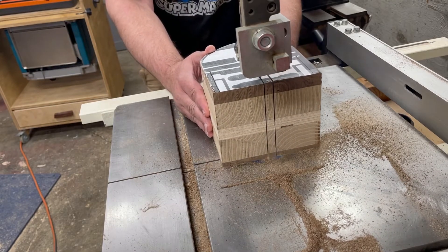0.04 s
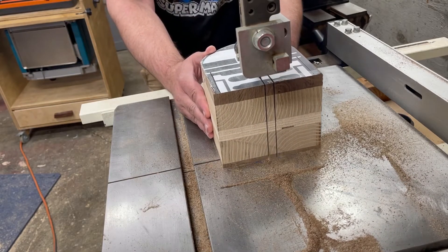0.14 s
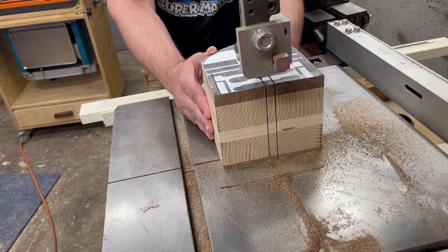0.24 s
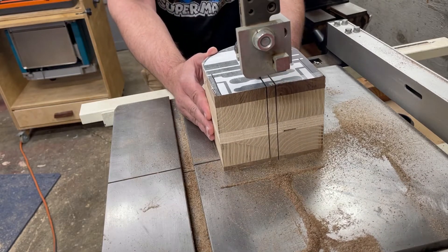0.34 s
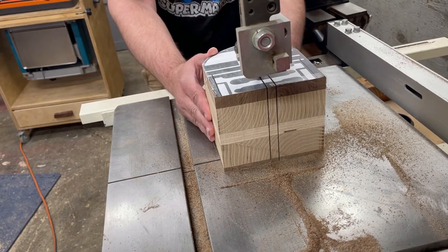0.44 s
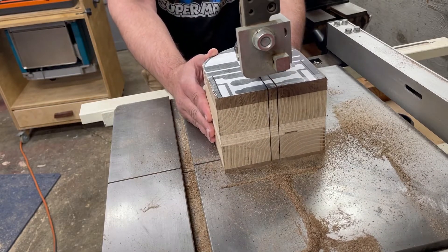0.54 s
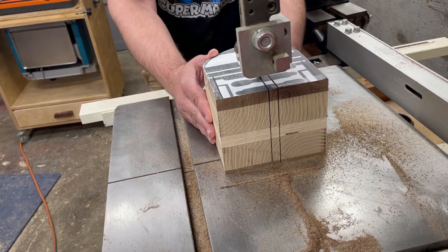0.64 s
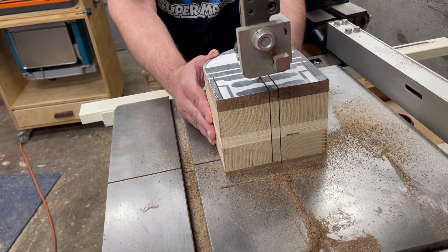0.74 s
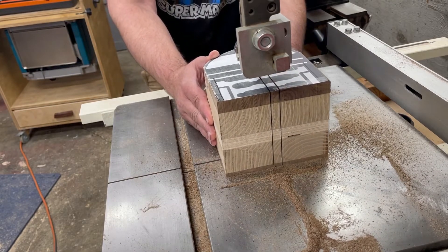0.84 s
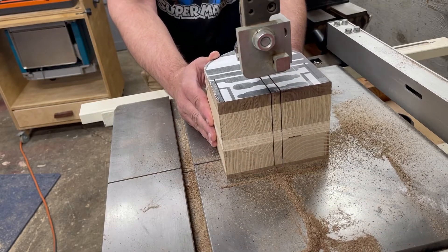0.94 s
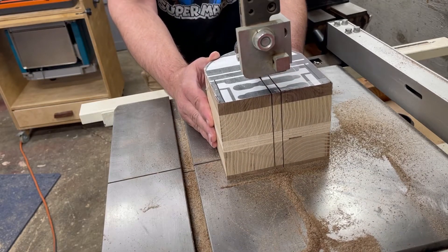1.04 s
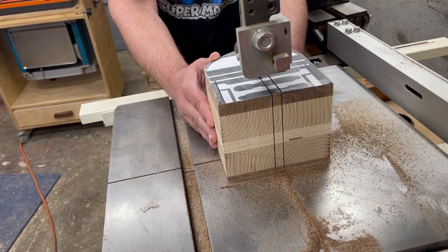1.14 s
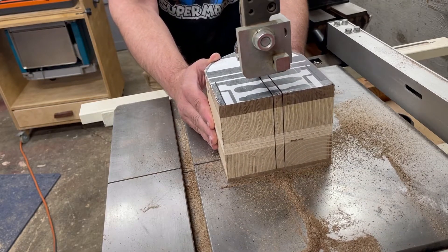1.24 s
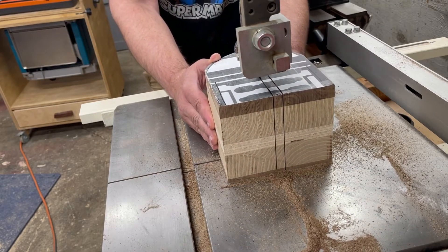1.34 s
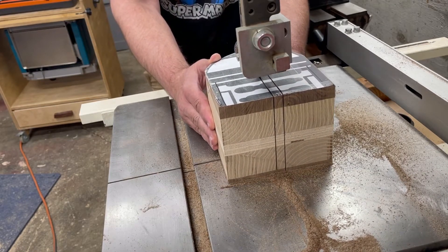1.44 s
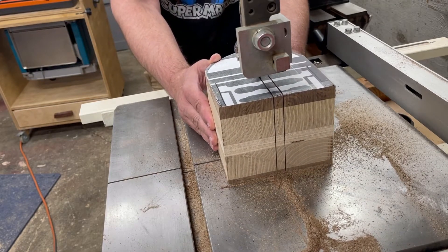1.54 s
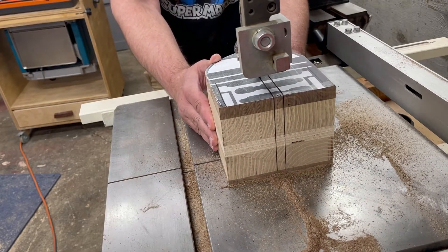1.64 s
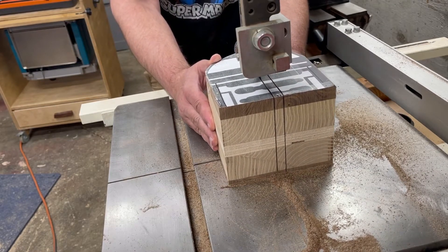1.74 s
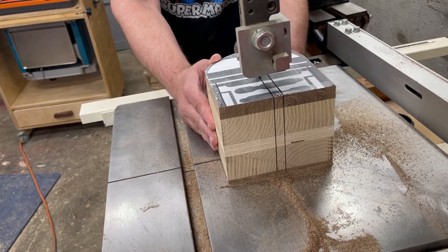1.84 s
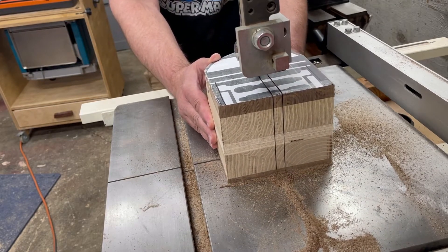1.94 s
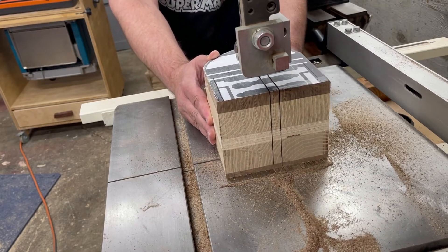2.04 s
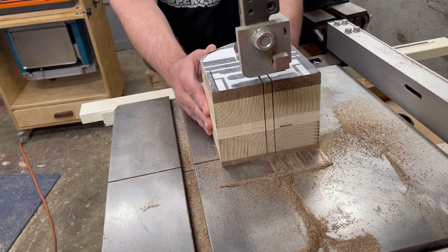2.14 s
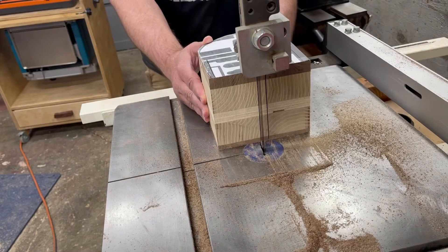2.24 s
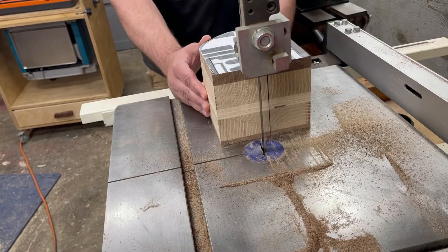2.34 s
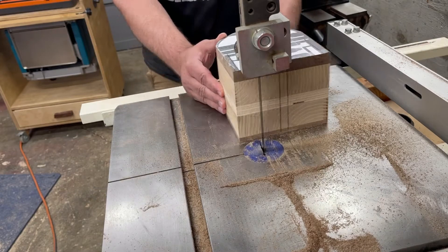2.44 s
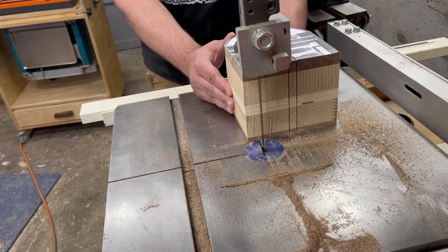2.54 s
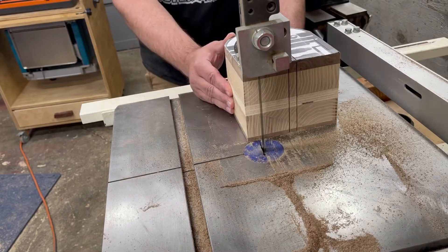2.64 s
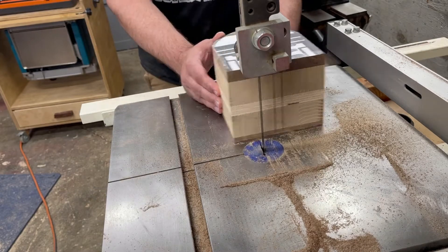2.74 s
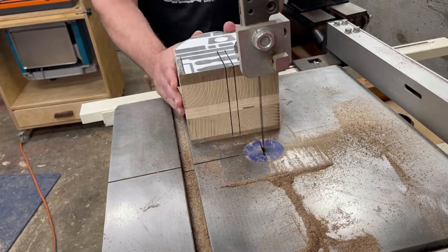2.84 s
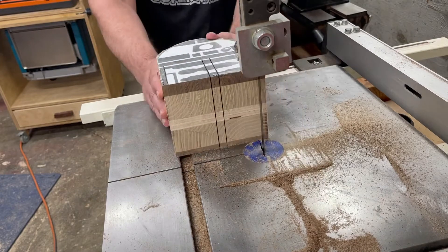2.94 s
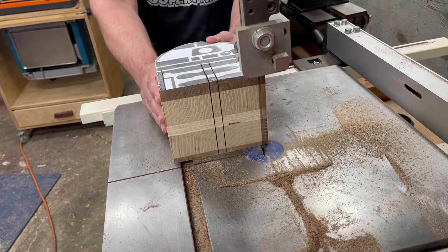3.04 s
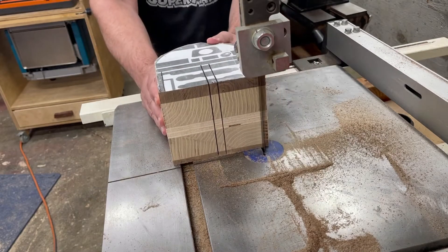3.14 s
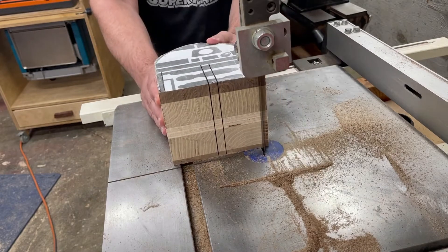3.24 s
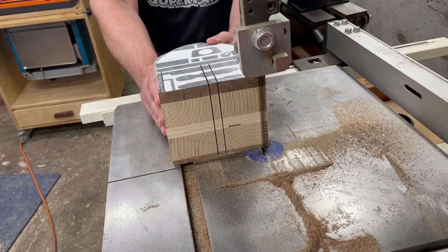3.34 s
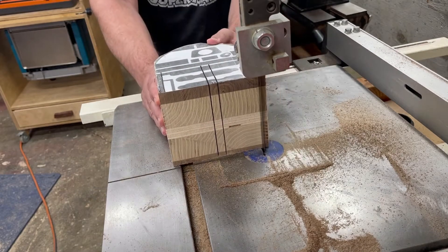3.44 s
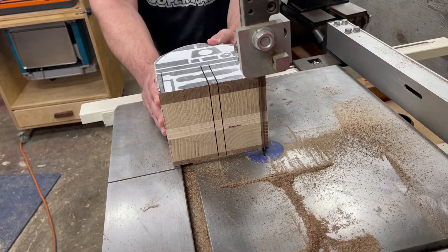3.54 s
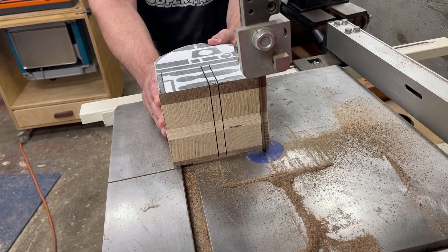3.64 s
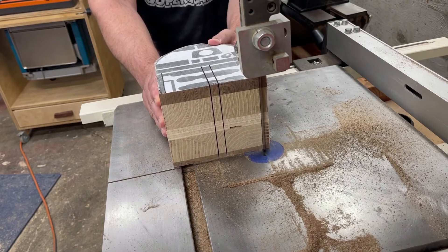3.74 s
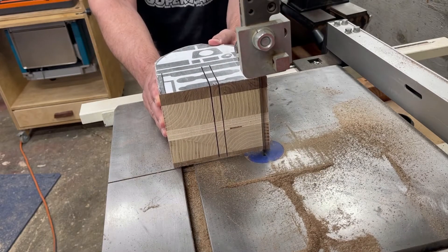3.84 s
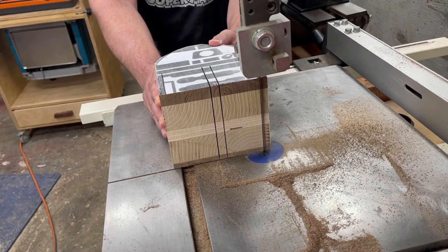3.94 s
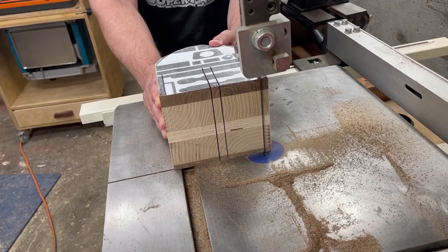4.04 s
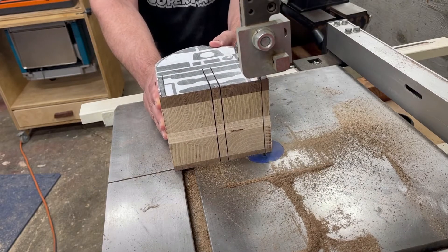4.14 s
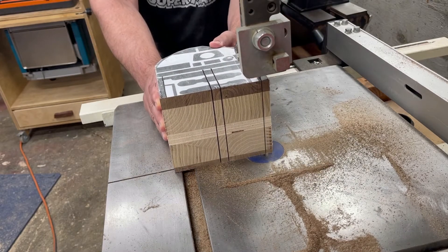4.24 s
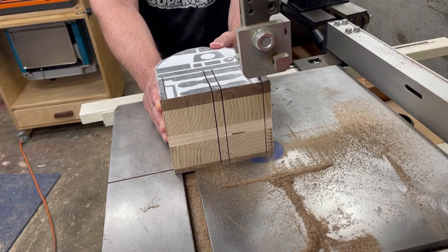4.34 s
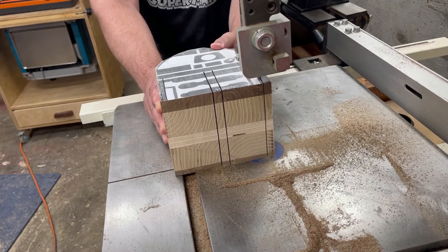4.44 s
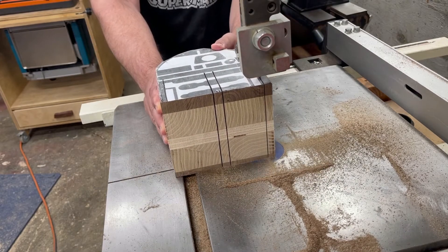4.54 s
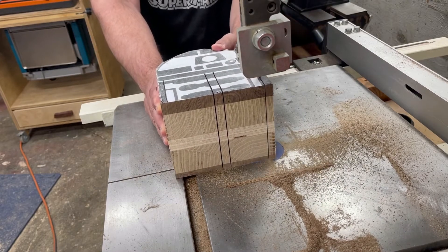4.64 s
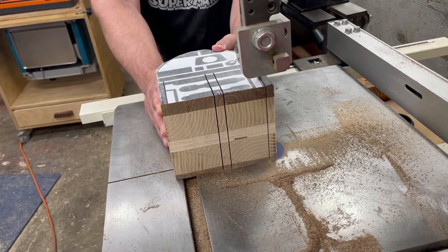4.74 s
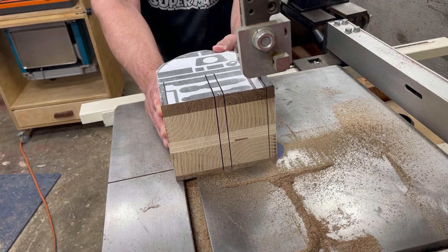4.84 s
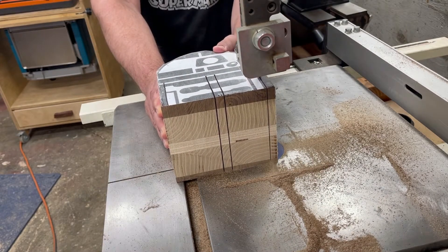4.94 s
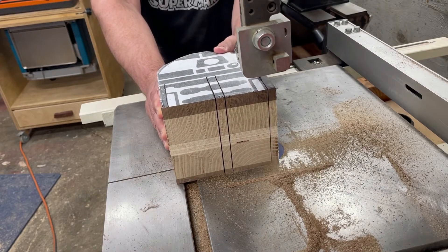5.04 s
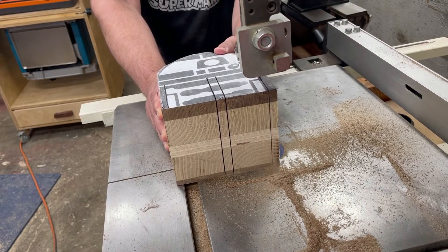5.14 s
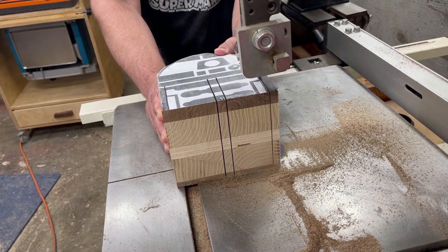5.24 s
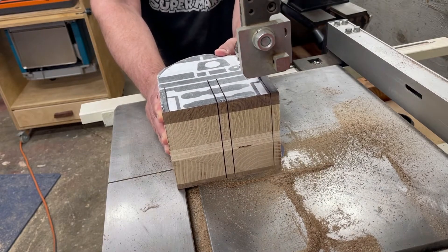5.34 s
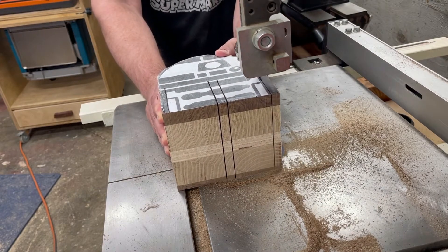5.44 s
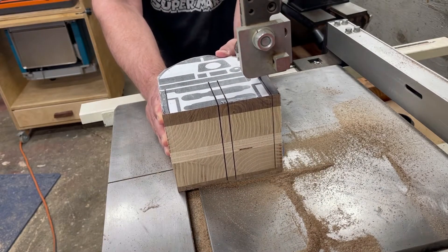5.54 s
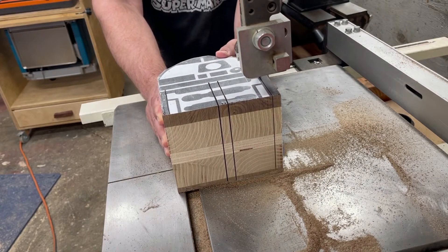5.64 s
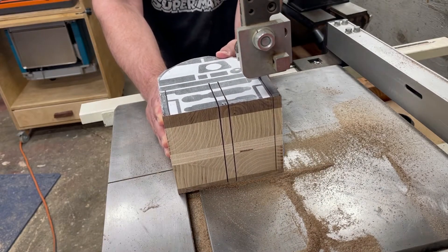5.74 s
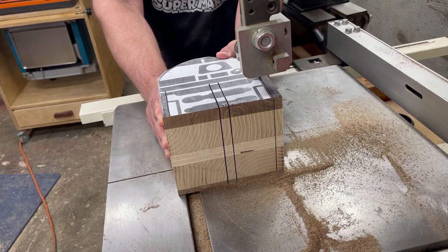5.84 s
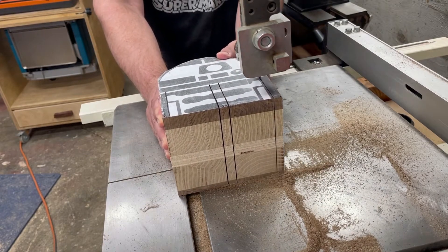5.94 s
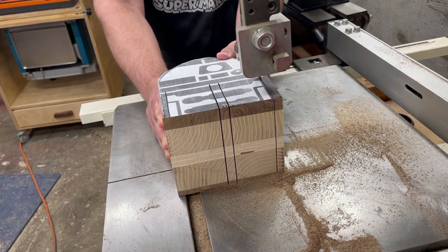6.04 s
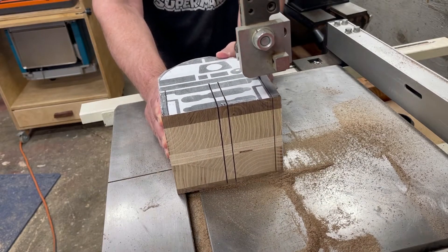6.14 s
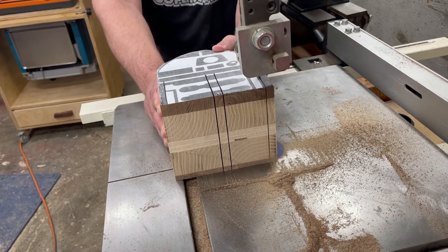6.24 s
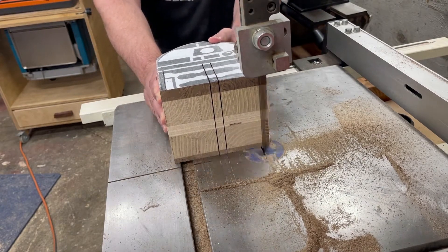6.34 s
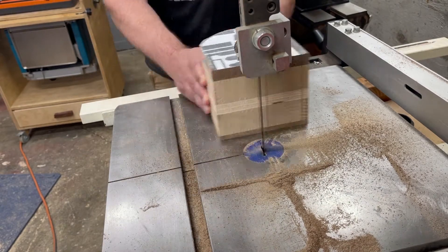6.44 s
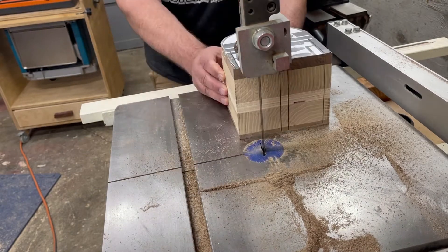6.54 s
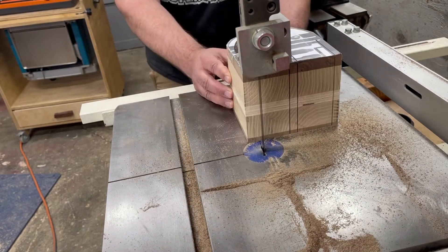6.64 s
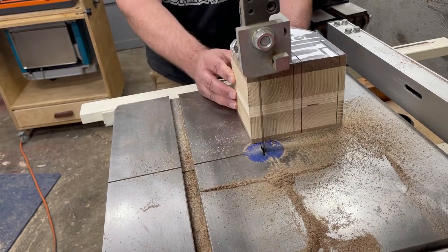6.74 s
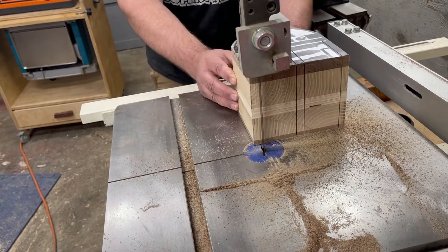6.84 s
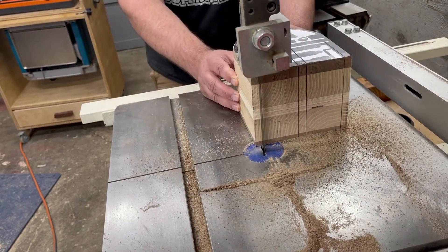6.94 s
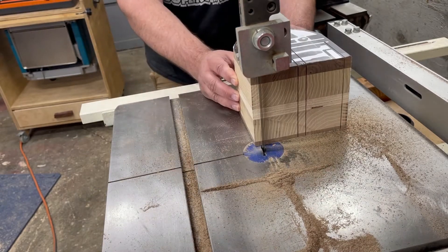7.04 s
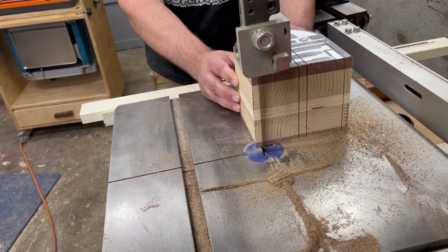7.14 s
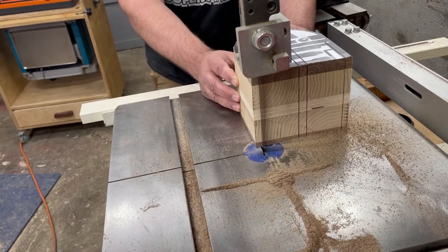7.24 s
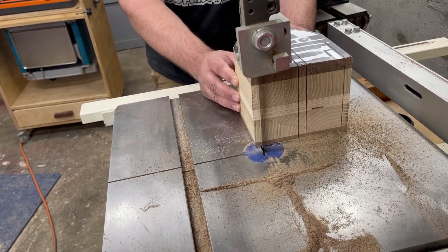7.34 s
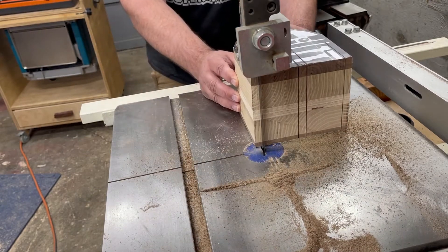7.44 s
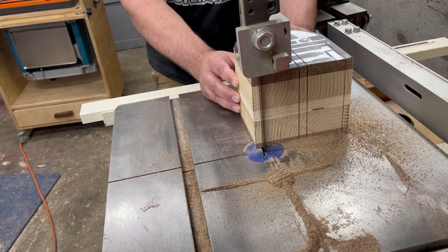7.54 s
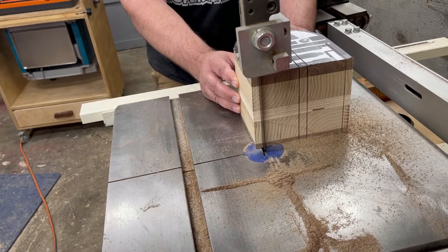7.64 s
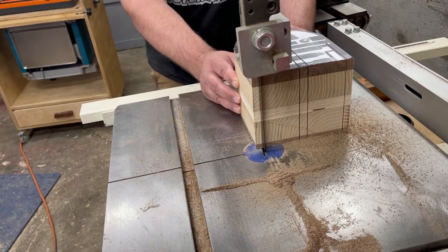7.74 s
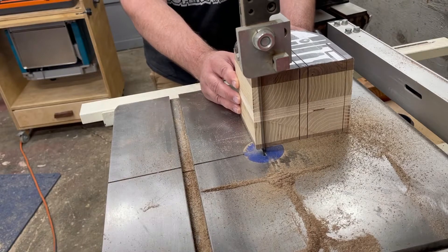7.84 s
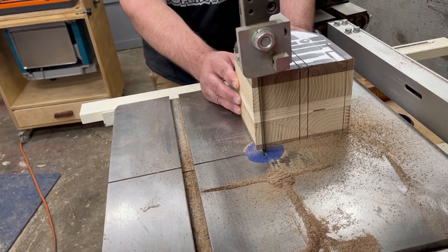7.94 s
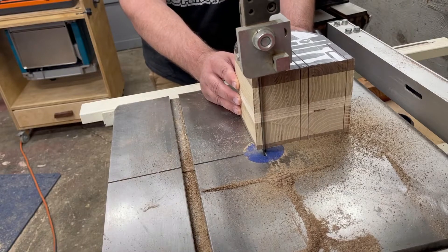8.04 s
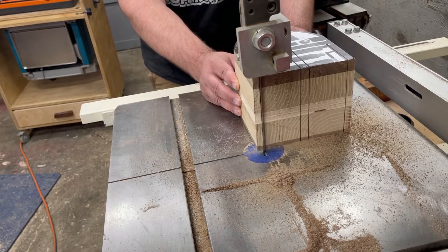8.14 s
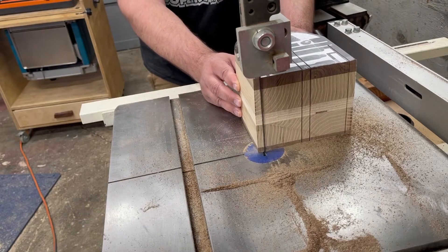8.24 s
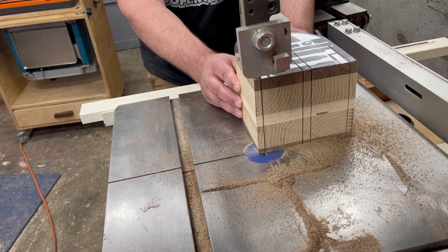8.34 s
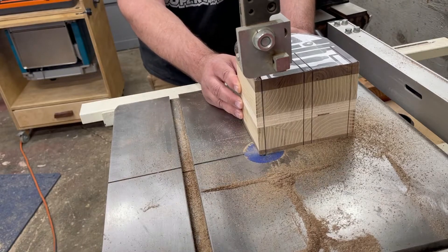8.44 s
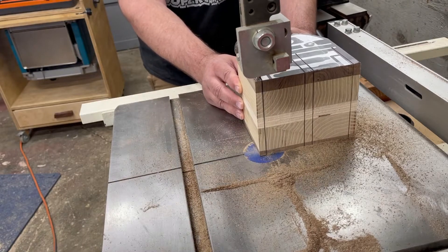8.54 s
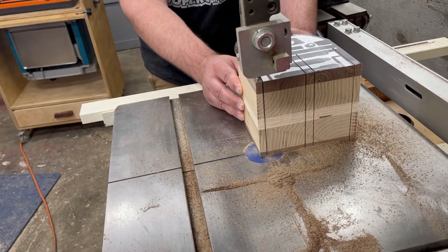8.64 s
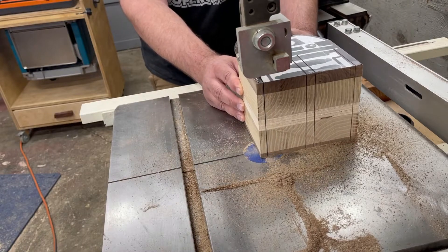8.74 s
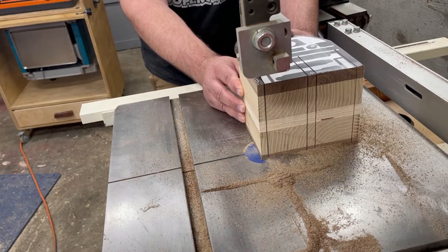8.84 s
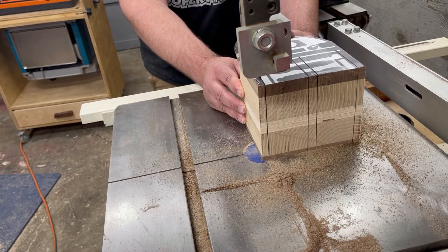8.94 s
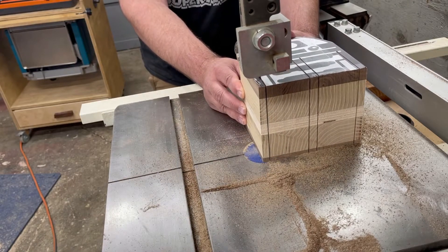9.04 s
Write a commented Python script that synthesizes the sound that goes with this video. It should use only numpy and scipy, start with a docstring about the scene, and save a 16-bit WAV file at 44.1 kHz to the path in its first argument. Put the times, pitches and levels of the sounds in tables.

```python
"""A bandsaw in a workshop takes three slices off a thick wooden block; the first is under way at the start.
Motor, wheels and guides hum throughout, and noise swishes along with the running band.
In each slice the teeth chip the wood and ring the steel band near 8 kHz; friction makes band and block sing
for moments, and the block chatters. The band's flank rubs its way out of the first slice, in and out of the
second after a gap, and into the third, which is still being cut at the end."""
import sys
import numpy as np
from scipy import signal
from scipy.fft import rfft, irfft, next_fast_len
from scipy.io import wavfile

SR = 44100
rng = np.random.default_rng(int(sys.argv[2]) if len(sys.argv) > 2 else 0)


def transcribe(u):
    """Save the signal u as a 16-bit wav file named by the first command-line argument.

    u: samples, shape (n,) or (channels, n), limited to [-1, 1]; the rate is SR.
    q: integer samples, one column per channel.
    """
    v = np.clip(np.atleast_2d(u).T, -1, 1)
    q = np.round(v * 32767).astype(np.int16)
    wavfile.write(sys.argv[1], SR, q)


N = 400869
TIME = np.arange(N) / SR  # s
PATTERN_HZ = 398  # repeat rate of the tooth pattern

# how hard the block is fed, one list of points for each slice: (t/s, feed/dB)
FEED = [
    [(0.0, -41), (0.01, -43), (0.77, -47.5), (0.83, -44.5), (1.07, -47), (1.21, -43), (1.41, -49.5),
     (1.43, -49.5), (1.69, -49), (1.86, -59), (2.17, -70), (2.19, -69)],
    [(3.17, -76), (3.41, -72), (3.49, -50), (3.68, -41.5), (3.8, -38.5), (4.44, -43), (4.52, -45),
     (4.88, -44.5), (5.03, -41), (5.88, -48.5), (6.16, -64.5), (6.33, -60.5)],
    [(7.6, -67), (7.644, -69), (7.736, -57.5), (7.932, -48.5), (7.972, -42.5), (8.168, -35.5),
     (8.172, -37.5), (8.358, -42.5), (8.38, -41), (8.578, -46), (8.586, -43.5), (9.09, -43)],
]


def from_db(db):
    """Decibels to gain."""
    return 10 ** (np.asarray(db) / 20)


def rms_one(x):
    """Scale to unit rms."""
    return x / np.sqrt(np.mean(x ** 2) + 1e-20)


def at_hz(points, hz):
    """Read a table on a log-frequency axis."""
    f, value = np.transpose(points)
    return np.interp(np.log(hz), np.log(f), value)


def in_time(rows):
    """Join the rows of a curve by straight lines."""
    s, *columns = np.transpose(rows)
    return [np.interp(TIME, s, c) for c in columns]


def spell(start, end, ramp):
    """On from start to end, with a short ramp outside either edge."""
    return np.clip(1 + np.minimum(TIME - start, end - TIME) / ramp, 0, 1)


def swell(start, end):
    """Rise after the start, hold, and die by the end."""
    ramp = .077  # s
    return spell(start + ramp, end - ramp, ramp)


def drift(rate):
    """Smooth chance of spread 1, changing at about the given rate in Hz."""
    step = 16  # samples between the points of the slow curve
    r = np.exp(-2 * np.pi * step * rate / SR)
    chance = rng.standard_normal(N // step + 3002)
    slow = signal.lfilter([1], [1, -2 * r, r * r], chance)[3000:]  # drop the filter's start-up
    return np.interp(np.arange(N) / step, np.arange(len(slow)), rms_one(slow))


def shape(x, gain_at):
    """Filter by a gain given as a function of frequency."""
    size = next_fast_len(N + 4096, real=True)
    hz = np.maximum(np.arange(size // 2 + 1) * SR / size, 1)
    return irfft(rfft(x, size) * gain_at(hz), size)[..., :N]


def high_pass(x, hz):
    """Thin out everything below the given frequency."""
    return signal.sosfilt(signal.butter(2, hz, "high", fs=SR, output="sos"), x)


def colour(x, spectrum):
    """Give a signal a broad spectrum; rms 1."""
    return rms_one(shape(x, lambda hz: from_db(at_hz(spectrum, hz))))


def resonate(x, modes, tilt_db=0):
    """Parallel resonances of alternating sign, leaning by tilt_db from the first to the last; rms 1."""
    out, power = 0, 0
    for k, (hz, width, db) in enumerate(modes):
        r = np.exp(-np.pi * width / SR)
        gain = from_db(db + tilt_db * (k / len(modes) - .5))
        feedforward = np.array([1, 0, -1]) * (1 - r * r) / 2
        feedback = [1, -2 * r * np.cos(2 * np.pi * hz / SR), r * r]
        out = out + (-1) ** k * gain * signal.lfilter(feedforward, feedback, x)
        power = power + gain ** 2 * width
    return rms_one(out / np.sqrt(power))


def tone(hz, wander_hz, flutter_db):
    """A machine tone wavering in pitch and level; rows are the direct and the reflected sound."""
    phase = 2 * np.pi * np.cumsum(hz + wander_hz * drift(6.09)) / SR
    level = np.sqrt(2) * from_db(flutter_db * drift(3.05))
    return level * np.array([np.sin(phase), np.cos(phase) * rng.choice([-1, 1])])


def feeding():
    """Whether the teeth are in the wood (0-1), and the feed in dB above a steady one."""
    catch_s, steady_feed_db = .03, -44  # the teeth take catch_s to catch the wood or to clear it
    in_wood = sum(spell(rows[0][0], rows[-1][0], catch_s) for rows in FEED)
    return in_wood, in_time(np.concatenate(FEED))[0] - steady_feed_db


def time_in_slice():
    """Seconds since the teeth last entered the wood."""
    return TIME - np.max([rows[0][0] * (TIME >= rows[0][0]) for rows in FEED], axis=0)


def shaking():
    """The shake of the frame in dB above the usual: each surge builds slowly and settles quickly."""
    # the shake grows while the band runs free and peaks as the teeth bite again: (peak t/s, rise/dB)
    surges = [(3.7, 9.5), (7.98, 8.5)]
    settled_db, build_s, settle_s = -2.5, 1.0, 0.25
    shake_db = settled_db
    for peak, rise_db in surges:
        distance = np.maximum((peak - TIME) / build_s, (TIME - peak) / settle_s)
        shake_db = shake_db + rise_db * np.exp(-distance)
    return shake_db


def motor(shake_db):
    """Steady tones of motor and bearings over a low rumble, louder as the frame shakes."""
    # tones of motor and bearings at the usual shake: (f/Hz, level/dB)
    hum_tones = [(120, -114), (176, -104), (212, -100), (239, -95), (320, -89.5), (360, -99.5),
                 (646, -86.5), (802, -80.5), (843, -86.5), (883, -82), (959, -79.5), (1005, -83.5)]
    # colour of the rumble: (f/Hz, density/dB)
    rumble_colour = [(15, -2), (50, -2), (100, -11), (150, -2), (300, -21)]
    rumble_db, gain_per_shake = -115, 0.88  # level at the usual shake; dB per dB of shake
    hum = sum(from_db(db) * tone(hz, wander_hz=0.91, flutter_db=3.0) for hz, db in hum_tones)
    rumble = from_db(rumble_db) * colour(rng.standard_normal((2, N)), rumble_colour)
    return from_db(gain_per_shake * shake_db) * (hum + rumble)


def wheels(in_wood, feed_db, shake_db):
    """Tooth pattern, wheel hum and band drone beat about forty times a second; wood damps the drone."""
    wheel_hz, drone_hz = 440.4, 480.3
    # levels at a steady feed and the usual shake, before the wood damps the drone
    pattern_db, wheel_db, drone_db = -80, -77, -72
    pattern_per_feed, pattern_per_shake = 0.26, 1.2  # dB per dB
    wheel_per_shake, drone_per_shake = 1, 1  # dB per dB
    drone_damping = 7.7  # by the wood at a steady feed
    pattern = in_wood * from_db(pattern_db + pattern_per_feed * feed_db + pattern_per_shake * shake_db)
    wheel = from_db(wheel_db + wheel_per_shake * shake_db)
    free_drone = from_db(drone_db + drone_per_shake * shake_db)
    drone = free_drone / (1 + drone_damping * in_wood * from_db(feed_db))
    tones = [(PATTERN_HZ, pattern), (wheel_hz, wheel), (drone_hz, drone)]
    return sum(level * tone(hz, wander_hz=.6, flutter_db=.7) for hz, level in tones)


def whine(hz):
    """A line that roughens with its pitch, as the band shivers in the guides."""
    shiver = 0.83 + .5 * drift(hz / 70)
    return tone(hz, wander_hz=hz * 0.001205, flutter_db=2.5) * shiver


def guides(in_wood, feed_db):
    """The band whines in its guides on many lines, and the wood damps them."""
    # lines of the band running free, before the shiver: (f/Hz, level/dB)
    lines = [(457, -78.5), (764, -83.5), (1287, -81.5), (1324, -90.5), (1540, -83.5), (2040, -79.5),
             (2089, -92), (2638, -82), (2756, -79), (2880, -79), (2998, -85.5), (3752, -84.5), (5179, -77),
             (5259, -81), (5792, -81.5), (9600, -88)]
    damping = 0.67  # by the wood at a steady feed
    free_whine = sum(from_db(db) * whine(hz) for hz, db in lines)
    return free_whine / (1 + damping * in_wood * from_db(feed_db))


def machine():
    """Motor, wheels and guides sound together, moved by the same feed and shake."""
    (in_wood, feed_db), shake_db = feeding(), shaking()
    return wheels(in_wood, feed_db, shake_db) + motor(shake_db) + guides(in_wood, feed_db)


def running_band():
    """The band swishes through its guides and the wheels stir the air, more as the frame shakes."""
    # colour of the swish: (f/Hz, density/dB)
    swish_colour = [(90, -56), (140, -39), (200, -21), (400, -16.5), (560, -13), (740, -10), (980, 0.5),
                    (1130, -10.5), (1750, -13), (2750, -14.5), (4300, -17), (5400, -11.5), (6300, -17.5),
                    (7700, -13), (9500, -19), (10100, -19), (12500, -20.5), (15500, -23.5)]
    swish_db, gain_per_shake = -68, 0.8  # level at the usual shake; dB per dB of shake
    level = from_db(swish_db + gain_per_shake * shaking() + .5 * drift(18))
    return level * colour(rng.standard_normal((2, N)), swish_colour)


def sing(hz, width, level):
    """One mode fed by friction, wavering in pitch and strength; rows are the direct and the reflected sound."""
    out, on = np.zeros((2, N)), level > 0
    sway = 1.01 + 0.36 * (drift(width) + 1j * drift(width))[on]
    phase = 2 * np.pi * np.cumsum(hz + 0.405 * width * drift(width)[on]) / SR
    wave = np.sqrt(2) * level[on] * sway * np.exp(1j * phase)
    out[:, on] = [wave.real, wave.imag * rng.choice([-1, 1])]
    return out


def chattering():
    """The block chatters on one broad mode when it is forced against the band or breaks free of it."""
    # spells of chatter: (start t/s, end t/s, level/dB)
    spells = [(1.2, 1.85, -69), (1.838, 2.215, -69), (6.081, 6.447, -65.5), (7.8, 8.25, -64.5)]
    return sum(sing(966, 120, from_db(db) * swell(start, end)) for start, end, db in spells)


def singing():
    """Friction holds single modes of band and block in song for a while; each swells, holds and dies."""
    # songs of band and block: (start t/s, end t/s, f/Hz, level/dB)
    songs = [(0, .4, 1248, -70), (0, 1.32, 3635, -69), (0, 1.35, 5510, -68), (1.13, 1.89, 580.5, -68),
             (1.28, 1.886, 6650, -62.5), (1.34, 1.793, 8300, -63), (1.6, 1.987, 2444, -72),
             (1.72, 1.92, 9370, -58.5), (2.656, 2.993, 1289, -68.5), (3.325, 3.602, 10230, -62.5),
             (3.378, 3.807, 9200, -52), (3.448, 4.1, 1246, -69), (3.6, 4.25, 510, -78),
             (3.701, 4.4, 580, -75), (3.757, 5.403, 3670, -71.5), (4.9, 5.4, 6500, -63.5),
             (4.895, 5.918, 1775, -76.5), (5.399, 5.947, 1247, -73), (5.93, 6.12, 8680, -56),
             (6.117, 6.382, 3730, -66), (6.747, 7.107, 1287, -73.5), (7.7, 8.2, 1248, -68),
             (7.7, 8.25, 9160, -56.5), (7.7, 8.95, 510, -72.5), (7.801, 8.91, 1018, -66.5),
             (8.45, 8.962, 3675, -64)]
    width_share = 0.0056  # width of a mode as a share of its frequency
    return sum(sing(hz, width_share * hz, from_db(db) * swell(start, end)) for start, end, hz, db in songs)


def rubbing():
    """The flank of the band scrapes along the fibres at the edge of the block; each rub swells and eases off."""
    # rubs as the band enters and leaves: (start t/s, peak t/s, end t/s, peak level/dB, swell/dB)
    rubs = [(1.856, 2.11, 2.21, -56, 10), (3.167, 3.423, 3.5, -59.5, 14), (6.1, 6.328, 6.335, -49, 21.5),
            (7.598, 7.85, 8.1, -63.5, 6)]
    # modes woken by the flank: (f/Hz, width/Hz, level/dB)
    rub_modes = [(3670, 120, -1.5), (4470, 750, -6), (5220, 190, 1), (5550, 110, 7.5), (6070, 320, 2),
                 (7400, 220, -20), (9400, 92, 1), (11270, 360, -3), (13300, 140, 0.5)]
    friction = rng.standard_normal((2, N)) * from_db(2.1 * drift(90))
    rasp = high_pass(resonate(friction, rub_modes), 800)
    level = 0
    for start, peak, end, db, swell_db in rubs:
        away = np.abs(TIME - peak) / (peak - start)
        level = level + spell(start, end, ramp=0.012) * from_db(db - swell_db * away)
    return rasp * level


def bites(turns, spread_db, pulsing, crumble, count=5):
    """Unevenly spaced teeth strike the wood, each with its own force, and fibres crumble between them."""
    tooth = np.floor(count * turns + .25 * drift(300))
    strength = from_db(spread_db * np.clip(rng.standard_normal(N), -2, 2))
    strikes = (np.diff(tooth, prepend=0) > 0) * strength
    force = rms_one(strikes * rng.standard_normal((2, N))) + crumble * rng.standard_normal((2, N))
    return force * (1 + pulsing * np.sin(2 * np.pi * turns))  # one pulse per tooth pattern


def ringing(turns, feed_db):
    """The bites ring the band; a shallow bite favours the higher modes, and the lean wanders slowly by chance."""
    # modes of the band before the lean: (f/Hz, width/Hz, level/dB)
    band_modes = [(7340, 87, -8), (7623, 108, -3), (7840, 73, -2), (8000, 116, -2), (8150, 54, -6),
                  (8195, 100, -1), (8360, 58, 0.5), (8530, 81, -3.5), (9020, 126, -5), (9210, 75, -14)]
    ring_db = -45.5  # at a steady feed
    tilt_db, tilt_per_feed, tilt_wander_db = -3, -0.14, 5.5  # steady lean, dB per dB of feed, chance
    lean_db = tilt_db + tilt_per_feed * feed_db + tilt_wander_db * drift(1.2)
    band = resonate(bites(turns, spread_db=2, pulsing=.28, crumble=.68), band_modes, lean_db)
    return from_db(ring_db + feed_db) * band


def chipping(turns, feed_db):
    """Chips hiss off the teeth; the kerf muffles them more and more as it grows longer."""
    # colour of the chips: (f/Hz, density/dB)
    chip_colour = [(1500, -56), (2500, -9.5), (3200, -0.5), (4000, -10), (4800, -3), (6000, -4.5),
                   (7000, 5), (8300, -1.5), (9600, 5), (11000, -2), (12500, 0.5), (14500, 2.5), (15600, 6)]
    chips_db, gain_per_feed = -47.5, 0.38  # level at a steady feed in a fresh kerf; dB per dB of feed
    muffle_db_per_s = 0.65
    chips = colour(bites(turns, spread_db=-2.5, pulsing=0.25, crumble=2.3), chip_colour)
    return from_db(chips_db + gain_per_feed * feed_db - muffle_db_per_s * time_in_slice()) * chips


def knocking(turns, feed_db):
    """The bites knock on the block's modes with a dull thud, harder with feed and shake."""
    # modes of block, table and frame: (f/Hz, width/Hz, level/dB)
    block_modes = [(455.4, 31, -7.5), (586, 21.3, -0.5), (783, 5.1, 6.5), (939, 51, -0.5), (1044, 56, 0.5),
                   (1251.4, 15.6, 4.5), (2034, 37, -8.5), (2238, 20, -4.5), (2752, 25, 2), (3134, 67, -4),
                   (3674, 26, 4), (5020, 65, -0.5), (5825, 40, 1)]
    # colour of the thud: (f/Hz, density/dB)
    thud_colour = [(60, -52), (140, -40), (200, -18), (350, -20.5), (550, -21.5), (700, -9), (1000, 3),
                   (1500, -5), (2300, -10.5), (3200, -12), (5000, -24.5), (9000, -47)]
    knock_db, thud_db = -61.5, -67.5  # at a steady feed and the usual shake
    gain_per_feed, gain_per_shake = 0.28, 0.3  # dB per dB
    block = resonate(bites(turns, spread_db=0.5, pulsing=0.17, crumble=0.6), block_modes)
    thud = colour(bites(turns, spread_db=4.0, pulsing=0.18, crumble=1.0), thud_colour)
    force = from_db(gain_per_feed * feed_db + gain_per_shake * shaking())
    return force * (from_db(knock_db) * block + from_db(thud_db) * thud)


def cutting():
    """The passing tooth pattern drives ring, chips and knock while in the wood; returns steel and wood."""
    in_wood, feed_db = feeding()
    turns = np.cumsum(PATTERN_HZ + 1.2 * drift(2)) / SR  # tooth patterns passed so far
    load = in_wood * from_db(.5 * drift(4.6))
    steel = ringing(turns, feed_db) + chipping(turns, feed_db)
    return load * steel, load * knocking(turns, feed_db)


def stereo(layers):
    """Both ears share the direct sound, the reflected sound makes the width; the saw stands a little right."""
    # left-right likeness: (f/Hz, likeness 0-1)
    likeness = [(40, .6), (130, .98), (300, .96), (640, .93), (1400, .88), (3000, .8), (8000, .9),
                (15000, .88)]
    # left minus right: (f/Hz, difference/dB)
    balance = [(200, 0.5), (400, -1.5), (700, 0), (1300, -3), (2400, -2.5), (4400, -5), (8100, -3),
               (15000, -3.5)]
    left_lag_s = .000007
    left = np.array([[1], [0]])

    def width(hz):
        """Side gain for the likeness at each frequency."""
        alike = np.clip(at_hz(likeness, hz), 0, .999)
        return np.sqrt((1 - alike) / (1 + alike))

    def ears(hz):
        """Level and lag of each ear."""
        level = from_db(at_hz(balance, hz) * (left - .5))
        return level * np.exp(-2j * np.pi * hz * left * left_lag_s)

    direct, reflected = layers
    pair = direct + shape(reflected, width) * [[1], [-1]]
    return shape(pair, ears)


def workshop(x, t60, wet_db, count=60):
    """Scattered echoes from table, fence and walls ripple the treble."""
    delays = rng.uniform(.001, .06, (2, count))  # s
    echoes = np.zeros((2, SR // 10))
    for side, delay in enumerate(delays):
        echoes[side, (delay * SR).astype(int)] = rng.choice([-1, 1], count) * from_db(-60 * delay / t60)
    echoes /= np.linalg.norm(echoes, axis=1, keepdims=True)
    return x + from_db(wet_db) * signal.fftconvolve(high_pass(x, 1500), echoes, axes=1)[:, :N]


def scene():
    """The bright sound of the band scatters off table and walls; block and machine sound more directly."""
    steel, wood = cutting()
    bright = stereo(steel + rubbing() + running_band())
    songs = high_pass(singing() + chattering(), 300)  # songs and chatter kept above 300 Hz
    return workshop(bright, t60=.1, wet_db=-2.0) + stereo(wood + songs + machine())


def record(dry):
    """The top is cut steeply."""
    cutoff_hz = 15850
    return shape(dry, lambda hz: 1 / np.sqrt(1 + (hz / cutoff_hz) ** 400))


dry = scene()
out = record(dry)
transcribe(out)
```